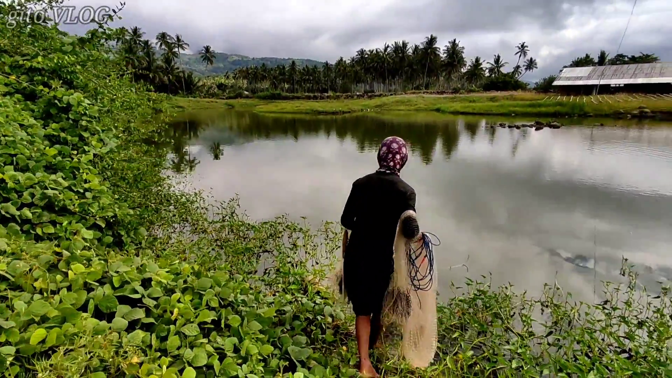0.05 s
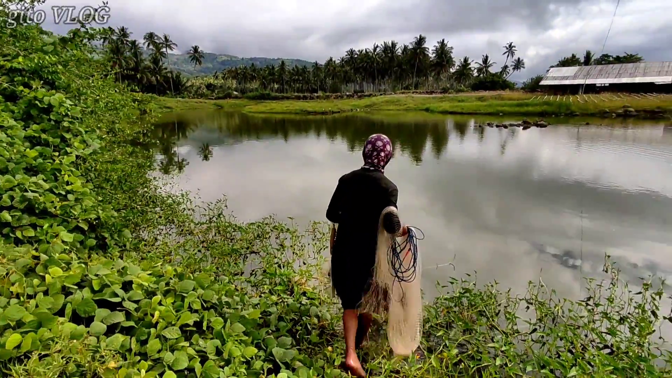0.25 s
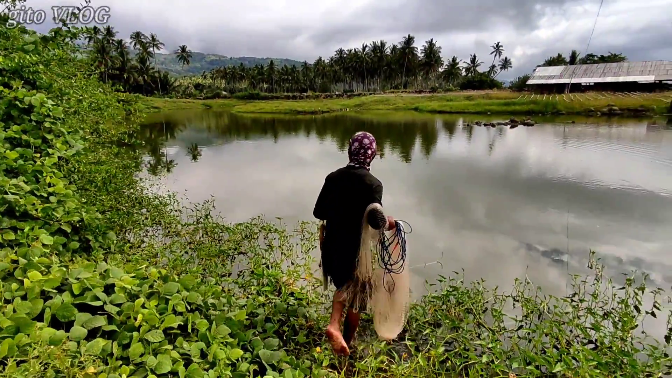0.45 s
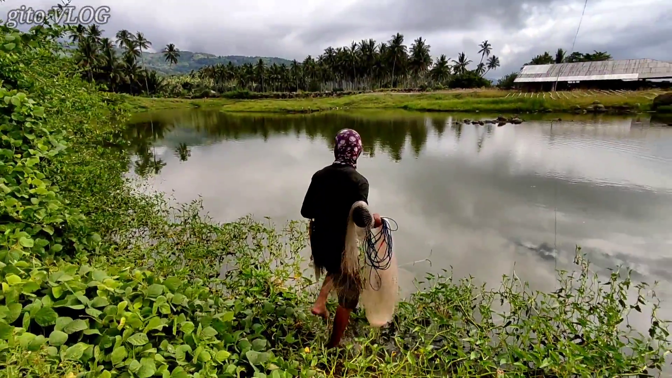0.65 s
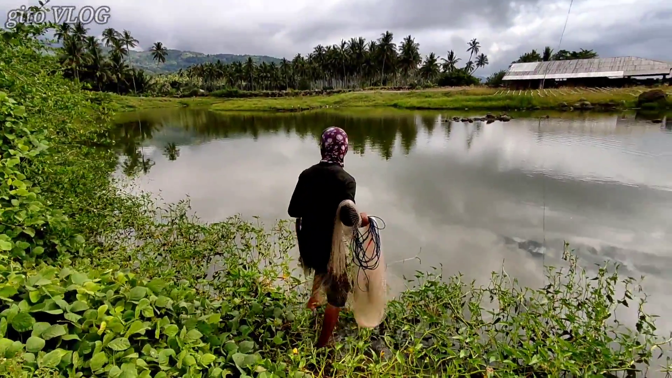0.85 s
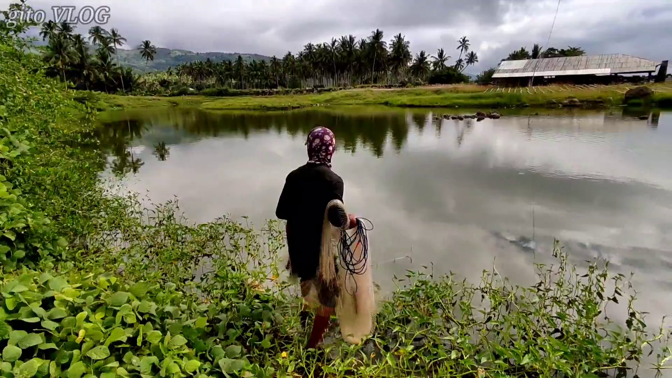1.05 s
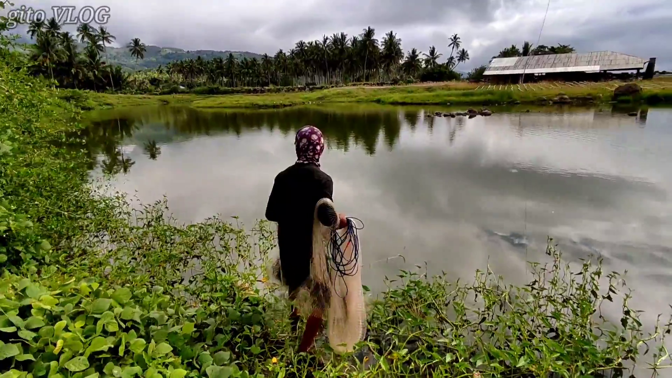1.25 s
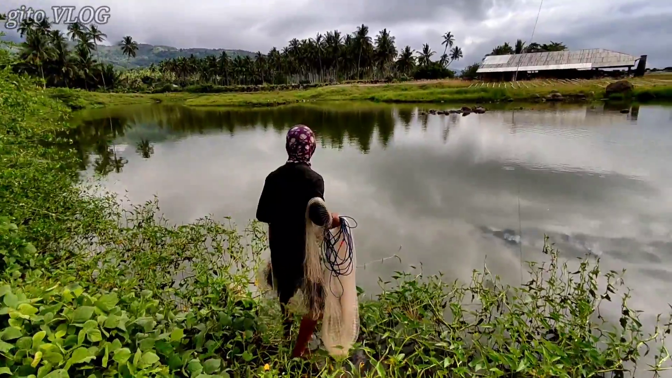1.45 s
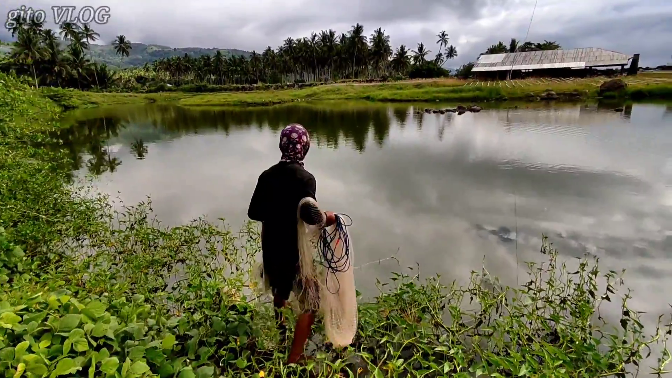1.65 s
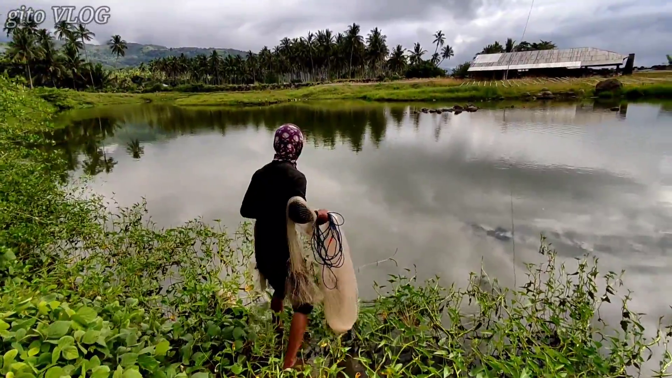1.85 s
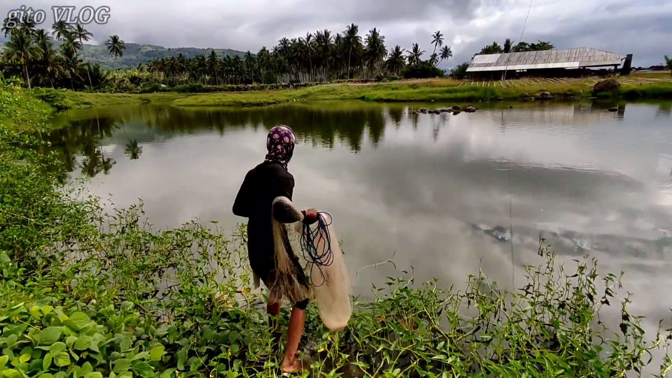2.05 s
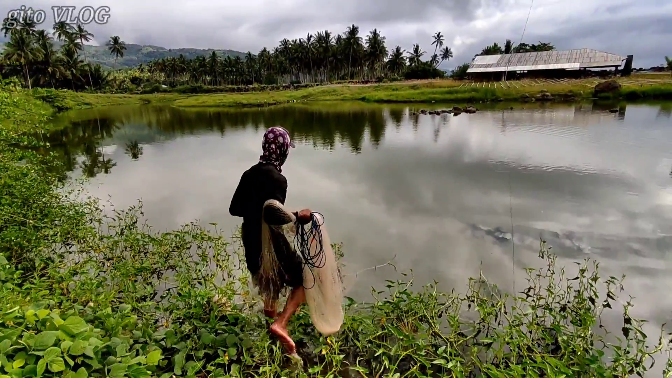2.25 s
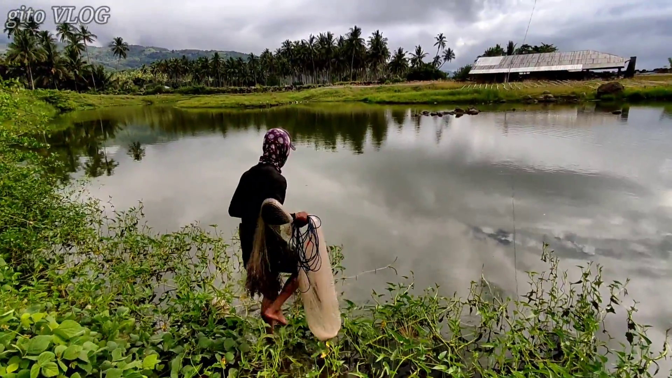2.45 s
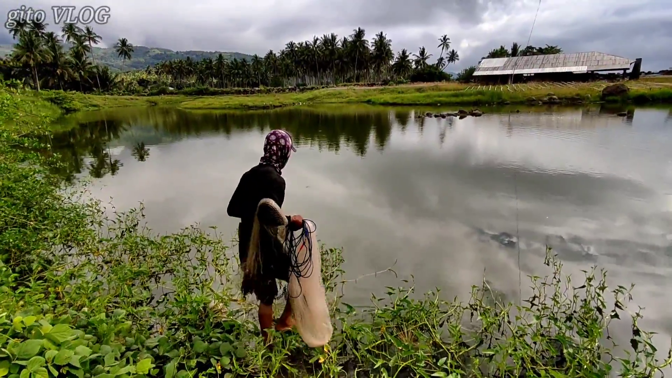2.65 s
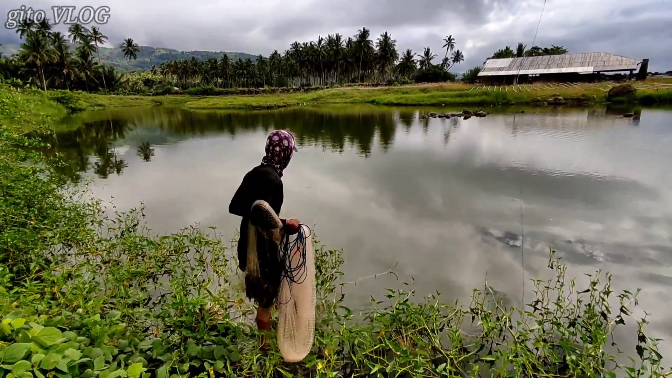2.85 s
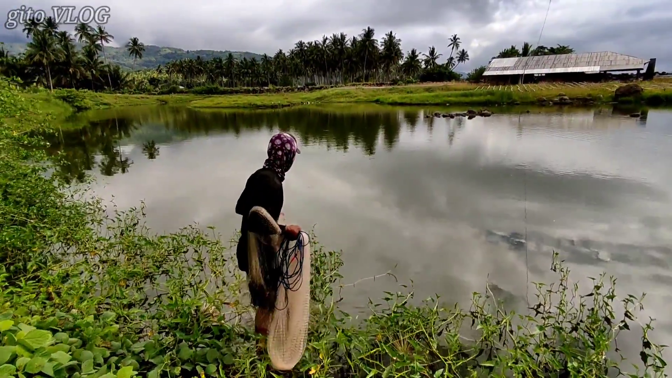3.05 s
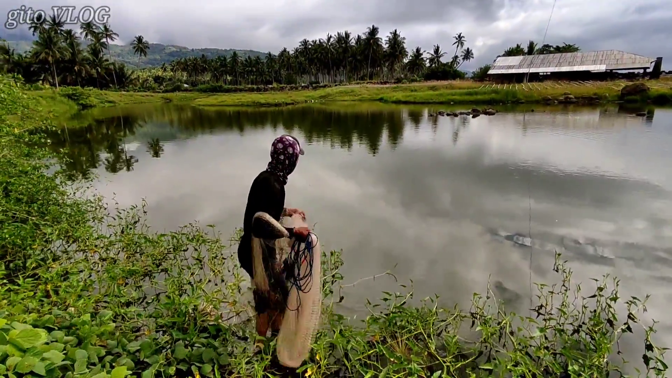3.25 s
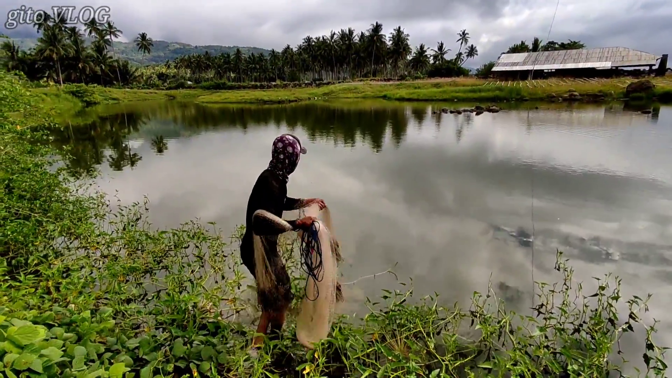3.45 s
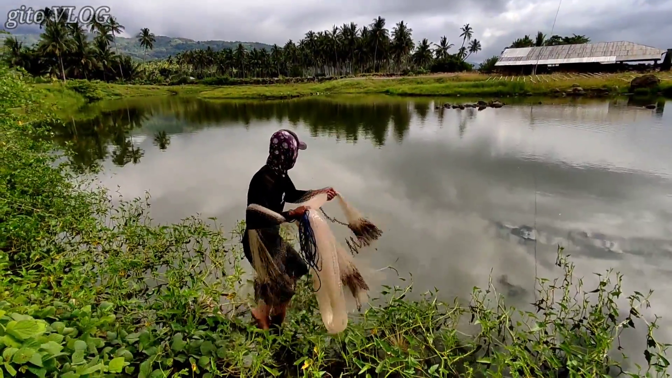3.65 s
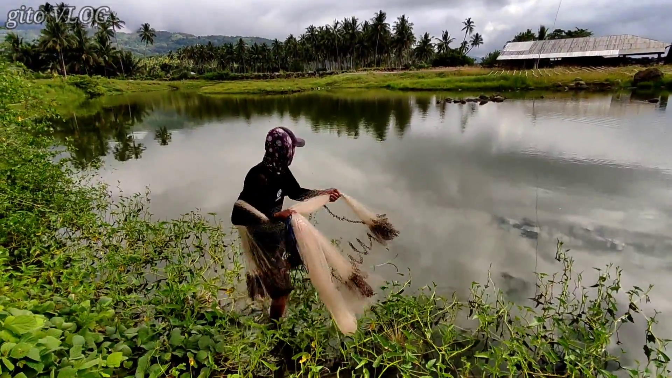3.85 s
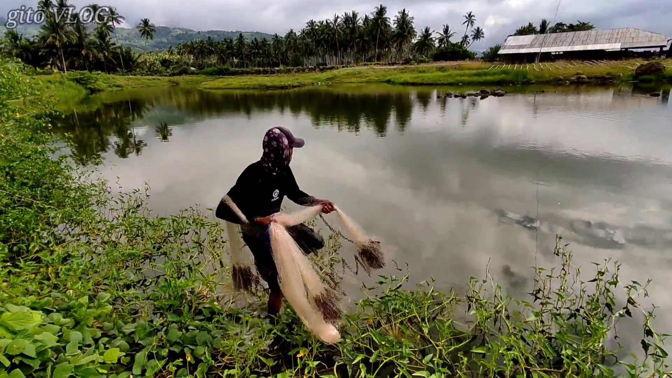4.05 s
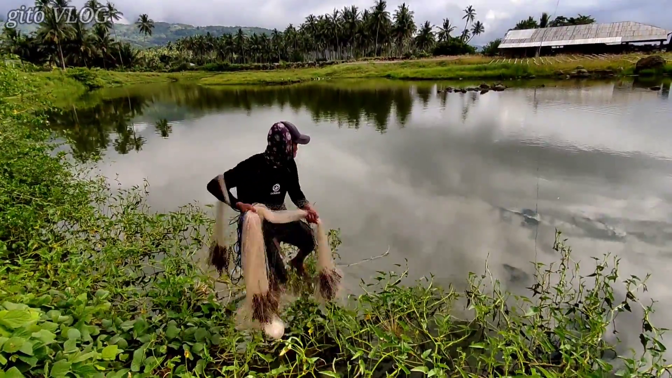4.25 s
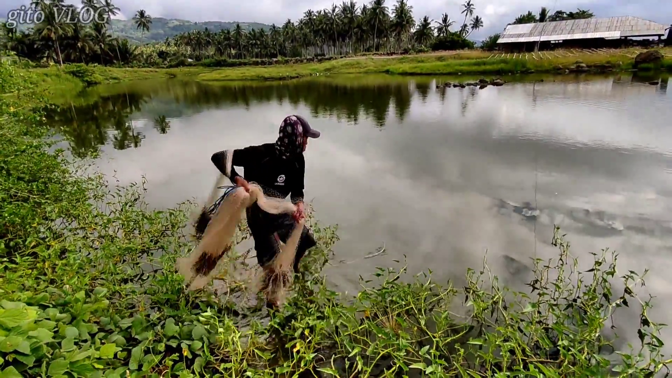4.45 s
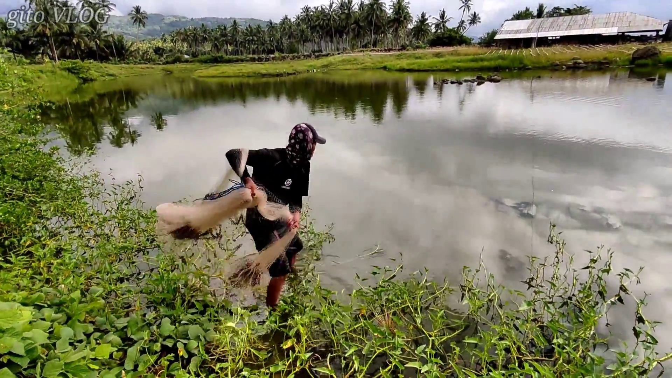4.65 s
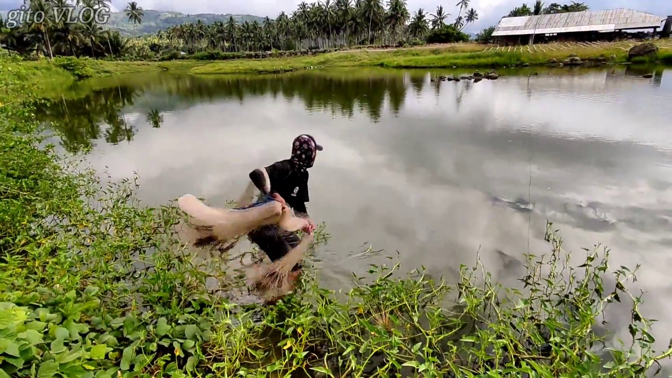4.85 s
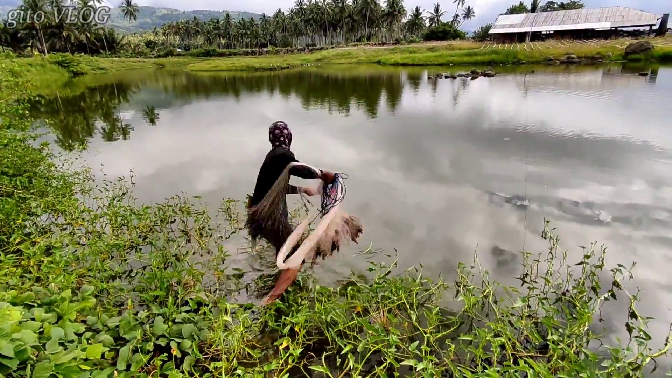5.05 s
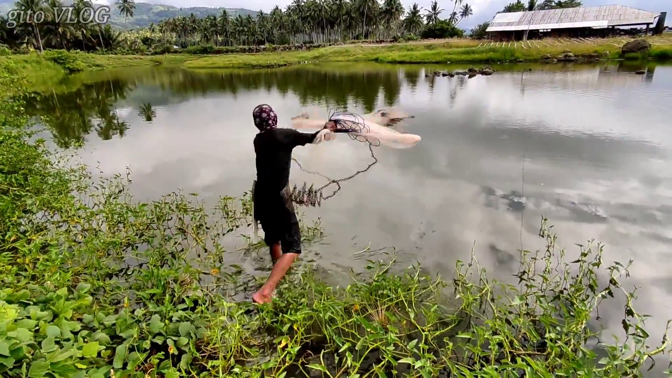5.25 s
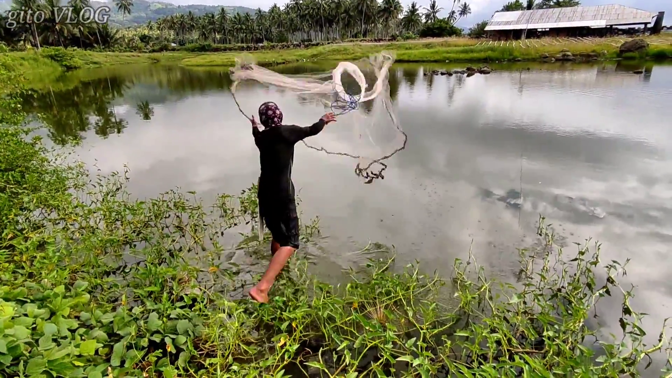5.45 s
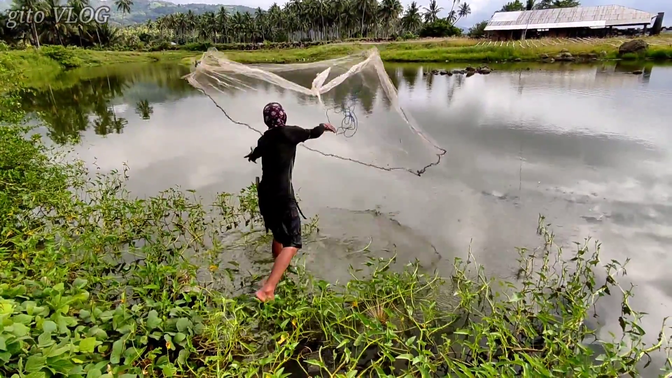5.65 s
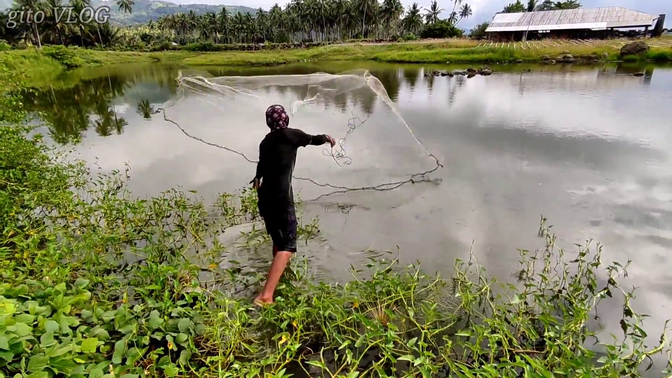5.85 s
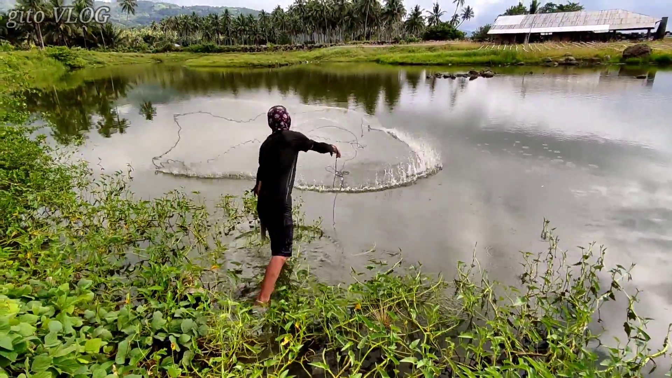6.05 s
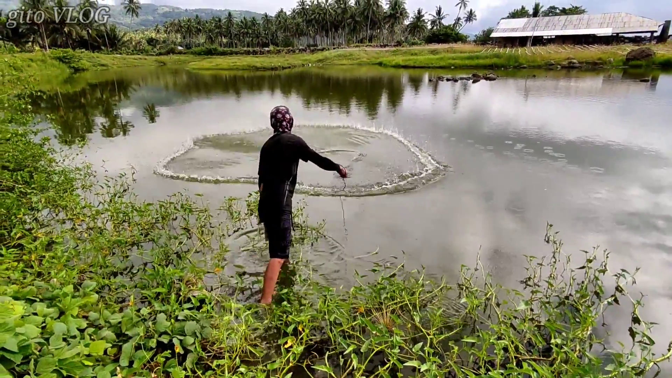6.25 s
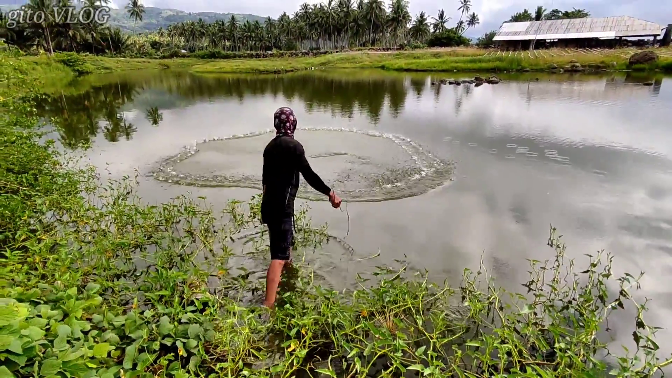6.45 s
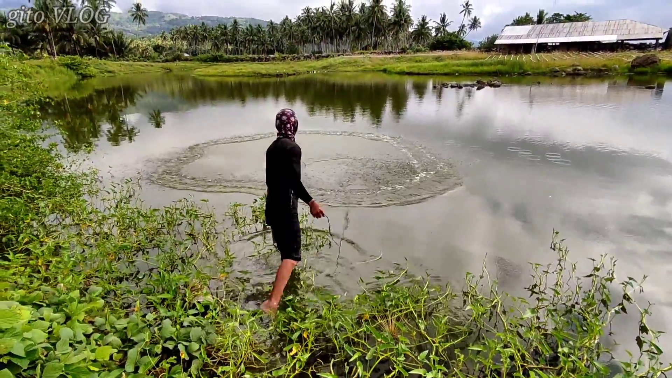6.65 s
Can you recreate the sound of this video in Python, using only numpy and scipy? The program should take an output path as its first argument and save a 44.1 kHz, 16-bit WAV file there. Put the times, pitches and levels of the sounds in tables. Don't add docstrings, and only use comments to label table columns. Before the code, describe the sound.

Outdoors beside a weedy pond, a bright insect chorus and regular rasping buzzes sit over low wind rumble. Someone wades slowly, with sparse stem snaps, rustling weeds and small gurgles. Net weights tick, wet mesh whips sharply and hisses through the air, then the weighted edge lands in a crisp ring of spray with ringing bubbles, fading quickly. The stereo microphones sound hissy, close and treble-heavy.

```python
import sys
import numpy as np
from scipy import signal
from scipy.io import wavfile

SR = 44100
rng = np.random.default_rng(int(sys.argv[2]) if len(sys.argv) > 2 else 0)


def level_to_linear(level):
    exponent = np.asarray(level, float) / 20
    return 10 ** exponent


def materialize(psi):
    bounded = np.clip(np.atleast_2d(psi).T, -1, 1)
    quanta = np.round(bounded * 32767).astype(np.int16)
    wavfile.write(sys.argv[1], SR, quanta)


N = 295881

# time in seconds, level in dB, left-right in dB.
SPRAY = [
    (6.004, -63, 7),
    (6.014, -34.5, 4),
    (6.12, -32.5, 1.5),
    (6.195, -33.5, 1.5),
    (6.262, -32.5, 0),
    (6.32, -30, 1.5),
    (6.41, -38, -2),
    (6.5, -42, -1),
    (6.58, -39.5, -1),
    (6.709, -44.5, -6),
]
# time in seconds, spray peak in dB, seconds to fall 20 dB, left-right in dB.
SLAPS = [
    (6.033, -30.5, 0.29, 1),
    (6.21, -22, -0.08, 0.5),
    (6.274, -29, -0.28, 3),
    (6.297, -29, -0.04, 4),
    (6.635, -48, 1.2, -5),
    (6.352, -46, -0.4, -3),
]
# time in seconds, peak in dB, seconds to fall 20 dB, left-right in dB.
GULPS = [
    (6.25, -42.5, 0.5, 1),
    (6.114, -38.5, 0.07, -1),
    (6.165, -47, -0.08, 0),
    (6.36, -34.5, 0.01, 2),
    (6.4, -52, -0.2, -1),
    (6.51, -49, 0.14, 0),
    (6.58, -53, 0.2, 0),
    (6.642, -47.5, 0.04, 1),
]
# time in seconds, peak in dB, seconds to fall 20 dB, left-right in dB.
WHIPS = [
    (5.037, -27.5, 0.11, -2.5),
    (5.072, -35, 0.07, -10),
    (5.31, -39, 0.12, -7),
    (5.385, -38.5, -0.1, 1.5),
    (5.535, -32, 0.17, -9.5),
    (5.604, -39, -0.05, 4),
    (5.628, -36.5, 0.08, -15),
    (5.744, -33, .08, 5),
    (5.934, -43, 0.8, 0),
]
# time in seconds, peak in dB, seconds to fall 20 dB, left-right in dB.
SAIL = [
    (5.61, -33.5, 0.4, 0),
]
# pitch in Hz, width in Hz, boost in dB.
MESH_PEAKS = [(7960, 510, 16), (11250, 360, 12.5)]
# time in seconds, bright peak in dB, dull peak in dB, left-right in dB.
SNAPS = [(1.1103, -24.5, -51, 31), (1.1906, -17, -58, -12), (1.1945, -15.5, -55, -2), (1.198, -16, -53, -9),
         (1.3374, -14, -30, -2), (1.34, -21, -33, -4), (4.856, -30, -62, 10), (4.861, -22, -62, 7),
         (5.923, -22, -58, 0), (2.6274, -18, -53, 5), (2.8395, -36, -29, 9), (2.8445, -36, -30.5, -13),
         (2.848, -31, -42, 0), (3.465, -13, -50, -1), (3.468, -22, -50, -3), (4.2971, -28, -27.5, 16),
         (4.3845, -8.5, -44, -7), (4.389, -22, -52, -10), (5.741, -12, -49.5, 4), (4.4307, -30, -41, -4),
         (4.4438, -8, -59, 14), (4.4622, -7.5, -26.5, 21), (4.7867, -9, -38, 10.5), (5.036, -17, -53, 5),
         (5.384, -25, -36, 2.5), (5.5348, -27, -52, -4), (5.6042, -23, -69.5, 6), (5.6264, -12, -54, -6),
         (6.015, -0.5, -45.5, -1), (6.2285, -4, -36, 0.5), (6.2714, -17, -22, -3), (6.634, -8, -44, -3),
         (4.791, -18, -62, 7), (1.555, -28, -43, -12), (1.63, -30, -60, 10)]
# time in seconds, peak in dB, pitch in Hz, left-right in dB.
GURGLES = [(1.103, -40, 2420, -3), (1.155, -48, 1050, -2), (1.339, -36, 1400, 8), (1.361, -38, 1335, -3),
           (1.376, -37.5, 1335, 2), (2.308, -44, 1800, -3), (2.358, -32.5, 1725, -3),
           (2.375, -41.5, 800, 0), (2.513, -44.5, 1500, 0), (2.63, -43, 1520, 2), (2.653, -47.5, 1000, 0.5),
           (2.753, -46, 2470, 0.5), (2.816, -37.5, 1980, 1), (2.828, -56, 670, 3),
           (2.844, -33, 2355, -11.5), (2.887, -48, 970, 0), (3.013, -48, 1230, 0), (3.176, -52.5, 895, -1),
           (3.464, -41.5, 2080, 18), (3.518, -42, 1990, 7), (3.788, -45, 2570, -14),
           (4.155, -53, 730, -1.5), (4.201, -48, 697, 3), (4.431, -31.5, 2440, -10), (5.368, -38, 2430, -8),
           (5.418, -39, 1370, 3), (5.516, -39, 2360, -7)]
# time in seconds, peak in dB, pitch in Hz.
PLOPS = [(4.373, -50, 560), (4.409, -50.5, 650), (4.406, -48, 1360), (4.43, -55, 1500), (4.601, -52, 628),
         (4.662, -47.5, 568), (4.661, -51, 1500), (4.707, -49.5, 368), (4.773, -51, 253), (4.912, -51, 604),
         (4.962, -54, 660), (6.028, -33, 1840), (6.092, -31.5, 1180), (6.11, -40, 540), (6.13, -38, 605),
         (6.152, -35, 890), (6.188, -38, 458), (6.205, -26, 2270), (6.265, -33.5, 716), (6.29, -31.5, 870),
         (6.335, -35, 617), (6.352, -29.5, 718), (6.395, -39, 624), (6.491, -45, 804), (6.508, -45, 580),
         (6.548, -39, 1180), (6.641, -39.5, 518), (6.06, -35.5, 1360), (6.104, -33.5, 1170),
         (6.12, -33, 644), (6.142, -35, 602), (6.165, -32, 1005), (6.22, -31, 2010), (6.345, -39, 670),
         (6.366, -32, 723), (6.492, -43, 1250), (.914, -50, 2440), (1.088, -52, 1520), (1.31, -45.5, 1350),
         (1.388, -40, 1330), (1.551, -52, 750), (2.28, -49, 1570), (2.347, -43, 1680), (2.946, -46, 1820),
         (2.993, -52.5, 700), (3.061, -47, 2000), (4.59, -54, 1020), (5.025, -52, 1210),
         (5.805, -43.5, 2140)]
# time in seconds, churned water in dB, brushed weeds in dB, seconds to fall 20 dB.
STEPS = [(0.56, -57.5, -62, 0.28), (0.92, -66, -53, -0.1), (1.1, -54, -62, 0.06), (1.181, -53, -58, 0.06),
         (1.345, -56, -53, 0.08), (1.38, -55, -62.5, 0.08), (1.559, -54, -50, 0.02),
         (1.87, -65, -51.5, 0.1), (2.295, -66, -55, 0.09), (2.368, -29, -48.5, -0.05),
         (2.52, -54.5, -59.5, 0.16), (2.63, -66.5, -66.5, 0.76), (2.759, -51, -48, 0.01),
         (2.844, -38, -44, 0.0066), (2.919, -55, -52, -0.05), (3.05, -69, -75, 0.35), (3.33, -63, -48, 0),
         (3.47, -48, -50, -0.02), (3.528, -61, -51.5, 0.11), (3.68, -75, -55, 0.05),
         (4.19, -53.5, -57, 0.14), (4.3, -75, -65, 0.25), (4.38, -63, -56.5, 0.18),
         (4.434, -53, -42, -0.02), (4.67, -57, -61, 0.3), (5.16, -64, -75, 0.28), (5.05, -55, -51.5, 0),
         (5.3, -56.5, -53, 0.2), (5.431, -59, -73, 0.1), (5.55, -58.5, -58, 0.5),
         (5.82, -56.5, -63.5, 0.27)]
# time in seconds, peak in dB, seconds to fall 20 dB, left-right in dB.
THUD = [
    (4.16, -40.5, 0.17, -2),
]
# time in seconds, pitch in Hz, level in dB.
RISING_DRIP = [
    [(5.375, 800, -65), (5.41, 1160, -63), (5.432, 1700, -59)],
]
# final level in dB, pitch in Hz, lower voice in dB.
BUZZ = [
    (-58.5, 11020, -63),
    (-60.5, 10900, -68),
    (-59.5, 10790, -74),
    (-60.5, 10850, -75),
    (-66, 10850, -62),
    (-58, 10900, -68),
    (-58, 10860, -61),
    (-58, 16000, -70),
]
# time in seconds, level in dB.
CHIRPS = [
    (0, -61),
    (1, -67.5),
    (2, -66),
    (3, -61),
    (3.6, -62.5),
    (4.2, -58),
    (4.5, -58),
    (5, -91),
    (6.71, -60),
]
# time in seconds, level in dB.
CHORUS = [
    (0.0, -39),
    (0.98, -41),
    (2.14, -40),
    (3.34, -40.5),
    (4.16, -40),
    (4.37, -36.5),
    (4.78, -41.5),
    (4.9, -39),
    (5.1, -39.5),
]
# start in seconds, end in seconds, level in dB.
TRILL = [
    (0.284, 0.45, -56),
    (0.498, 0.7, -69),
    (.7, .79, -61),
    (2.04, 2.2, -61),
    (3.29, 3.558, -56),
    (4.942, 5.02, -54),
    (5.1, 5.3, -54),
]
# time in seconds, pitch in Hz, level in dB.
GLIDES = [
    [(1.785, 11500, -64), (1.83, 12700, -59), (1.872, 14200, -61)],
    [(1.795, 12400, -68), (1.845, 13800, -67)],
    [(1.915, 13600, -66), (1.935, 13800, -59), (1.962, 13200, -62)],
    [(1.965, 12800, -67), (2.005, 12950, -64), (2.03, 12750, -62), (2.052, 12150, -63)],
    [(2.095, 13450, -63), (2.128, 13850, -60), (2.17, 12650, -63)],
    [(1.855, 11800, -63), (1.87, 12400, -65)],
    [(1.87, 10900, -65), (1.9, 11500, -63)],
    [(2.06, 13750, -63), (2.08, 13600, -65)],
    [(2.17, 13800, -66), (2.2, 13500, -62)],
]
# time in seconds, pitch in Hz, level in dB.
PIPS = [
    (.98, 11400, -64.5),
    (1.2, 11300, -61),
    (1.9, 11500, -68),
    (2.025, 11300, -64),
    (2.38, 11500, -54),
    (2.63, 11250, -52),
    (3.81, 11300, -66),
]
# time in seconds, pitch in Hz, level in dB.
COOS = [
    [(0.02, 1227, -68), (0.2, 1162, -69), (0.42, 1146, -70), (0.47, 1060, -76)],
    [(4.95, 1199, -73), (5.1, 1170, -74), (5.27, 1140, -69)],
    [(3.4, 830, -75), (3.5, 820, -71), (3.68, 810, -75)],
]
# time in seconds, level in dB.
DRONE = [
    (0, -59),
    (1, -71),
    (3.6, -67),
    (4.3, -58),
    (5.2, -58),
    (6.71, -60),
]
# time in seconds, level in dB, left-right in dB.
WIND = [(0.0, -39.5, -14), (0.3, -49.5, -6), (0.6, -48.5, -3), (1.04, -49, -3), (1.49, -48.5, 0),
        (1.94, -51.5, 0), (2.28, -49.5, 1), (2.71, -52, -1), (2.88, -46.5, 0.5), (3.36, -51, 5),
        (3.83, -48.5, -2), (4.6, -54.5, -5.5), (5.3, -50, -2), (5.75, -52.5, -2), (6.1, -50.5, 0.5),
        (6.71, -42, -8)]
# frequency in Hz, density in dB per Hz.
WIND_COLOUR = [(12, 1), (20, 4.5), (65, 4.5), (119, -7.5), (145, -26.5), (242, -28), (282, -24.5),
               (400, -33.5), (520, -57), (880, -120)]
# time in seconds, peak in dB, seconds to fall 20 dB, left-right in dB.
PUFFS = [(0.145, -40.5, 0.06, -14), (.27, -42.5, 0.13, -15), (0.44, -44, 0.1, -11.5), (0.03, -48, -0.4, -8),
         (0.69, -39.5, 0.05, -15), (.735, -49, .06, -12), (.89, -48, -0.03, -9), (0.83, -39, 0, -3),
         (1.07, -61, 0, 4), (2.87, -57, -0.07, 11), (3.48, -48, -0.05, 10), (3.67, -45, 0.08, 11.5),
         (3.93, -44, 0.05, -9), (4.295, -50, .06, 8), (6.3, -49, 0.1, -8)]
# frequency in Hz, density in dB per Hz.
AIR_COLOUR = [(60, 7.5), (120, 1.5), (200, -4.5), (400, -9.5), (1000, -15.5), (2200, -15), (3500, -19.5),
              (6500, -18), (8500, -13), (10000, -11), (11000, -13), (12200, -17), (14000, -20)]
# frequency in Hz, left-right likeness from 0 to 1.
LIKENESS = [(40, 0.23), (130, 0.99), (300, 0.64), (640, 0.65), (1400, 0.02), (3000, 0.013), (15000, 0.006)]
# pitch in Hz, width in Hz, boost in dB.
LEFT_PORT = [(8050, 160, 13.5), (10846, 1290, 17.5)]
RIGHT_PORT = [(8383, 610, 17), (10300, 1660, 8), (14200, 4350, -9)]

WADE_SPAN_S, CAST_SPAN_S, SPLASH_SPAN_S = (.3, 6.0), (5.0, 6.0), (5.99, 6.71)
SLAP_RISE, GULP_RISE, WHIP_RISE, SAIL_RISE = .12, 0.69, .14, 1.12
STEP_RISE, THUD_RISE, PUFF_RISE = 1, 0.11, 0.68
FIZZ_DB, FIZZ_FOLLOWS = -39, 0.68
CRACKLE_DB, AIR_DB = -23.5, -53.5
BUZZ_FIRST_END_S, BUZZ_EVERY_S, BUZZ_LENGTH_S, BUZZ_FINISH_S = .548, .7475, 0.6, .19
BUZZ_CLIMB_HZ, PIP_S = 278.5, 0.025
LEFT_LAG_SAMPLES, TOP_HZ = 6, 15400


def rms_one(x):
    return x / np.sqrt(np.mean(x ** 2) + 1e-20)


def filtered(x, order, hz, kind):
    return signal.sosfilt(signal.butter(order, hz, kind, fs=SR, output="sos"), x)


def in_time(rows):
    s, level, *rest = np.transpose(rows)
    t = np.arange(N) / SR
    level = np.interp(t, s, level, left=-120, right=-120)
    return [level] + [np.interp(t, s, column) for column in rest]


def at_hz(points, hz):
    point_hz, value = np.transpose(points)
    return np.interp(np.log(hz), np.log(point_hz), value)


def drift(rate_hz):
    r = np.exp(-80 * np.pi * rate_hz / SR)
    white = rng.standard_normal(N // 40 + 2002)
    slow = signal.lfilter([1], [1, -2 * r, r * r], white)[2000:]
    return np.interp(np.arange(N) / 40, np.arange(len(slow)), rms_one(slow))


def resonate(x, hz, width_hz):
    r = np.exp(-np.pi * width_hz / SR)
    poles = [1, -2 * r * np.cos(2 * np.pi * hz / SR), r * r]
    return signal.lfilter([(1 - r * r) / 2, 0, (r * r - 1) / 2], poles, x + 1e-18)


def port(x, peaks):
    for hz, width_hz, db in peaks + peaks:
        x = x + (level_to_linear(db / 2) - 1) * resonate(x, hz, width_hz)
    return x


def placed(x, pan_db):
    return np.array([np.roll(x, LEFT_LAG_SAMPLES) * level_to_linear(pan_db / 2), x * level_to_linear(-pan_db / 2)])


def humps(rows, rise):
    s, db, fall_s, pan_db = np.transpose(rows)[:, :, None]
    t = np.arange(0, N + 32, 32) / SR
    fall_s = np.maximum(fall_s, .01)
    shape_db = db - 20 * np.maximum((t - s) / fall_s, (s - t) / (rise * fall_s))
    sides = [level_to_linear(shape_db + side * pan_db).sum(axis=0) for side in (.5, -.5)]
    return np.array([np.interp(np.arange(N) / SR, t, gain) for gain in sides])


def grains(span_s, per_s, spread_db, low_hz, high_hz, cycles, tilt_db, clump_db):
    start, end = round(span_s[0] * SR), min(round(span_s[1] * SR), N)
    n, out = end - start, np.zeros(N)
    sizes = level_to_linear(spread_db * np.minimum(rng.exponential(1, n), 4)) * rng.choice([-1, 1], n)
    born = rng.random(n) < per_s * level_to_linear(clump_db * drift(40)[start:end]) / SR
    dealt = rng.integers(0, 12, n)
    rings = 0
    for k, hz in enumerate(np.geomspace(low_hz, min(high_hz, .45 * SR), 12)):
        tilt = level_to_linear(tilt_db * np.log2(hz / low_hz))
        rings = rings + tilt * resonate(sizes * born * (dealt == k), hz, 1.7 * hz / cycles)
    out[start:end] = rms_one(filtered(rings, 3, 1.07 * low_hz, "high"))
    return out


def wide(*how, **named):
    return np.array([grains(*how, **named), grains(*how, **named)])


def cast_net():
    hiss = wide(CAST_SPAN_S, 12000, 4.1, 7900, 18000, cycles=7.2, tilt_db=4.5, clump_db=3.1)
    swish = rms_one(port(hiss, MESH_PEAKS))
    return level_to_linear(-16) * (humps(WHIPS, WHIP_RISE) + humps(SAIL, SAIL_RISE)) * swish


def splash():
    spray = wide(SPLASH_SPAN_S, 13000, 0.97, 2650, 13100, cycles=4.0, tilt_db=4.5, clump_db=2.0)
    large = grains(SPLASH_SPAN_S, 600, 2.5, 467, 1140, cycles=11.0, tilt_db=-2.5, clump_db=1.5)
    small = wide(SPLASH_SPAN_S, 1800, 1.4, 1130, 2680, cycles=5.1, tilt_db=-7.0, clump_db=2.5)
    spray_db, spray_pan_db = in_time(SPRAY)
    falling = level_to_linear(spray_db + np.array([[.5], [-.5]]) * spray_pan_db) + humps(SLAPS, SLAP_RISE)
    fizz = level_to_linear(FIZZ_DB + FIZZ_FOLLOWS * (spray_db + 33.0)) * small
    return level_to_linear(-5.0) * falling * spray + humps(GULPS, GULP_RISE) * placed(large, .3) + fizz


def snaps():
    bright, dull = np.zeros((2, N)), np.zeros((2, N))
    t = np.arange(round(0.035 * SR)) / SR
    for s, bright_db, dull_db, pan_db in SNAPS:
        crackle = rng.standard_normal(len(t)) * np.exp(-t / 0.002)
        tick = placed((np.arange(len(t)) == 0) + level_to_linear(CRACKLE_DB) * crackle, pan_db)
        i = round((s + 0.0011) * SR)
        bright[:, i:i + len(t)] += level_to_linear(bright_db - 6.5) * tick
        dull[:, i:i + len(t)] += level_to_linear(dull_db + 14.5) * tick
    return filtered(bright, 2, 4500, "high") + filtered(dull, 1, [500, 3500], "band")


def bubble(hz):
    t = np.arange(round(.06 * SR)) / SR
    decay = hz / 8.0
    ring = np.sin(2 * np.pi * hz * (.95 * t + 0.0392 * decay * t * t))
    return ring * np.exp(-decay * t) * (1 - np.exp(-t / 0.00012))


def gurgles():
    out = np.zeros((2, N))
    rows = [(*row, 3) for row in GURGLES] + [(*row, 0, 1) for row in PLOPS]
    for s, db, hz, pan_db, count in rows:
        c = rng.random(4)
        mates = [(0, hz, db + 0.5),
                 (0.015 * c[0], hz * (0.5 + 0.363 * c[1]), db - 17.5),
                 (0.023 * c[2], hz * (1.626 + 0.78 * c[3]), db)]
        for late_s, pitch_hz, level_db in mates[:count]:
            plop = bubble(pitch_hz)
            i = round((s + late_s) * SR)
            out[:, i:i + len(plop)] += level_to_linear(level_db) * placed(plop, pan_db)
    return out


def wading():
    bubbles = grains(WADE_SPAN_S, 900, 2.5, 516, 2640, cycles=17.6, tilt_db=3.0, clump_db=5.5)
    rustle = wide(WADE_SPAN_S, 4000, 6.0, 1670, 9000, cycles=1.2, tilt_db=0.5, clump_db=4.5)
    water = humps([(s, db - 3.0, fall_s, 0) for s, db, _, fall_s in STEPS], STEP_RISE)
    weeds = humps([(s, db + 2.0, fall_s, 0) for s, _, db, fall_s in STEPS], STEP_RISE)
    return water * placed(bubbles, -0.59) + weeds * rustle


def thud():
    push, squelch = rng.standard_normal((2, N))
    push = resonate(resonate(push, 85, 110), 85, 110)
    squelch = filtered(squelch, 1, [200, 900], "band")
    return humps(THUD, THUD_RISE) * (rms_one(push) + level_to_linear(-12) * rms_one(squelch))


def stridulation(pulse_hz, hz, width_hz, duty, rough):
    phase = np.cumsum(pulse_hz * (1 + 0.012 * drift(7.7))) / SR % 1
    burst = np.sin(np.pi * np.clip(phase / duty, 0, 1)) ** 2
    clicks = burst * ([[1], [0]] + rough * rng.standard_normal((2, N)))
    r = np.exp(-np.pi * width_hz / SR)
    along, across = signal.lfilter([1], [1, -2 * r, r * r], clicks)
    turn = 2 * np.pi * np.cumsum(hz * np.ones(N)) / SR
    return rms_one(along * np.sin(turn) + across * np.cos(turn))


def buzz():
    glide, swell, finish = [], 0, 0
    for k, (db, hz, low_db) in enumerate(BUZZ):
        end = BUZZ_FIRST_END_S + BUZZ_EVERY_S * k
        start = end - BUZZ_LENGTH_S
        glide += [(start, hz - BUZZ_CLIMB_HZ), (end - .24, hz), (end, hz)]
        swell = swell + level_to_linear(in_time([(start, db - 14.0), (end - .25, db - 2.5), (end, db)])[0])
        finish = finish + level_to_linear(in_time([(end - BUZZ_FINISH_S, low_db - 2.0), (end, low_db)])[0])
    pitch_hz = np.interp(np.arange(N) / SR, *np.transpose(glide))
    upper = swell * stridulation(99, pitch_hz, 420, duty=0.9, rough=11.0)
    lower = finish * stridulation(92, 10520, 220, duty=0.91, rough=12.0)
    return placed(upper + lower, 0.21)


def chirps():
    beat = (np.arange(N) / SR - .085) * 8 % 1
    gate = np.clip(4.8 * np.sin(np.pi * np.clip(beat / 0.725, 0, 1)), 0, 1)
    rasp = stridulation(197, 9150, 700, duty=.7, rough=15.0)
    return placed(level_to_linear(in_time(CHIRPS)[0]) * gate * rasp, 21.0)


def trill():
    on = sum(level_to_linear(in_time([(a, db - 8), (a + 0.055, db), (b, db - 9)])[0]) for a, b, db in TRILL)
    return placed(on * stridulation(45, 13650, 600, duty=1.5, rough=60.0), 7.4)


def chorus():
    level = level_to_linear(np.interp(np.arange(N) / SR, *np.transpose(CHORUS)) - 12.5)
    blur = rms_one(resonate(rng.standard_normal((2, N)), 8836, 420))
    throb = stridulation(32, 8450, 1000, duty=0.82, rough=34.0)
    return level * (blur + level_to_linear(-10.0) * placed(throb, -6.5))


def whistles(calls, wobble, flutter_db=3.5):
    out, flutter, waver = 0, flutter_db * drift(26), 1 + wobble * drift(28)
    for rows in calls:
        level_db, hz = in_time([(s, db, f) for s, f, db in rows])
        out = out + level_to_linear(level_db + flutter) * np.sin(2 * np.pi * np.cumsum(hz * waver) / SR)
    return placed(out, 20.0)


def tonal_calls():
    half = PIP_S / 2
    pips = [[(s - half, hz, db - 2), (s, hz, db), (s + half, hz, db - 3)] for s, hz, db in PIPS]
    thin = level_to_linear(-2) * whistles(GLIDES + pips, wobble=0.007)
    drip = whistles(RISING_DRIP, wobble=0.022)
    return thin + drip + level_to_linear(-3) * whistles(COOS, wobble=0.02, flutter_db=6.0)


def drone():
    hum = resonate(resonate(rng.standard_normal(N), 114, 70), 114, 70)
    return level_to_linear(in_time(DRONE)[0] + 1.3 * drift(6)) * rms_one(hum)


def banded_noise(spectrum, edges_hz, patchy_db):
    out, together, white = 0, drift(9.2), rng.standard_normal((2, 2, N))
    for k, (low, high) in enumerate(zip(edges_hz, edges_hz[1:])):
        mid, side = filtered(white[k % 2], 2, [low, high], "band")
        hz = np.sqrt(low * high)
        alike = np.clip(at_hz(LIKENESS, hz), -1, 1)
        gain = level_to_linear(at_hz(spectrum, hz) + patchy_db * (0.36 * together + drift(11.6)))
        out = out + gain * (np.sqrt(1 + alike) * mid + np.sqrt(1 - alike) * side * [[1], [-1]])
    return rms_one(out)


def gusts(wind_db):
    lumps = level_to_linear(2.8 * drift(30.0) + 1.4 * drift(5.2))
    buffet = rms_one(filtered(rng.standard_normal((2, N)), 3, [90, 250], "band"))
    return level_to_linear(-71 + 1.7 * (wind_db + 46.5)) * lumps * buffet


def wind():
    wind_db, pan_db = in_time(WIND)
    blowing = level_to_linear(wind_db + pan_db * np.array([[.5], [-.5]])) + humps(PUFFS, PUFF_RISE)
    rumble = blowing * banded_noise(WIND_COLOUR, np.geomspace(15, 300, 7), patchy_db=1.5)
    return rumble + gusts(20 * np.log10(blowing))


def air():
    return level_to_linear(AIR_DB) * banded_noise(AIR_COLOUR, np.geomspace(60, 15000, 15), patchy_db=2.0)


def scene():
    fisher = cast_net() + splash() + snaps() + gurgles() + wading() + thud()
    insects = buzz() + chirps() + trill() + chorus()
    return fisher + insects + tonal_calls() + drone() + wind() + air()


def low_pass(x):
    return signal.sosfilt(signal.butter(12, 15580, fs=SR, output="sos"), x)


def record(dry):
    ported = np.array([port(dry[0], LEFT_PORT), port(dry[1], RIGHT_PORT)])
    mix = signal.sosfilt(signal.cheby2(12, 60, TOP_HZ, fs=SR, output="sos"), ported)
    return low_pass(mix)


dry = scene()
out = record(dry)
materialize(out)
```